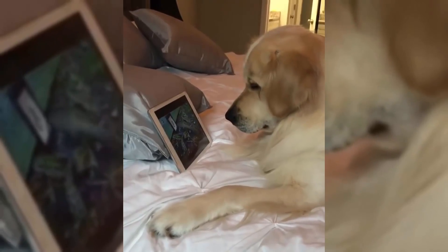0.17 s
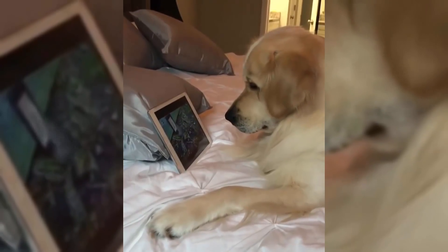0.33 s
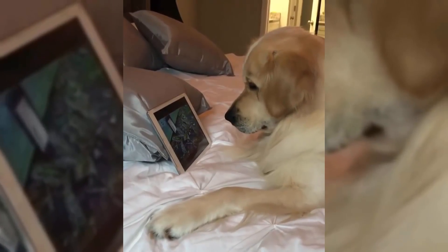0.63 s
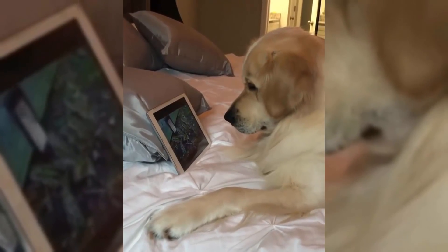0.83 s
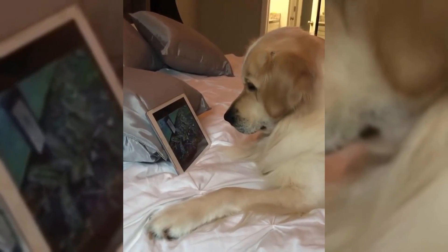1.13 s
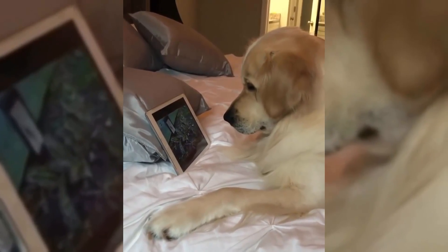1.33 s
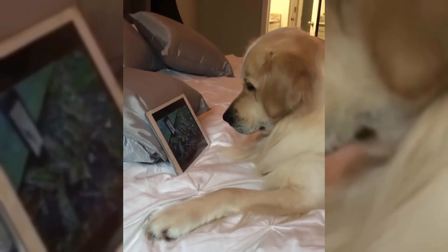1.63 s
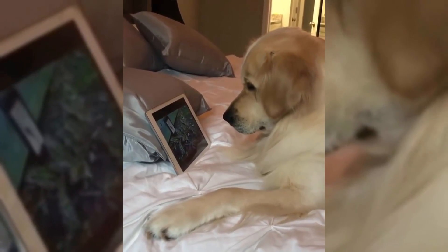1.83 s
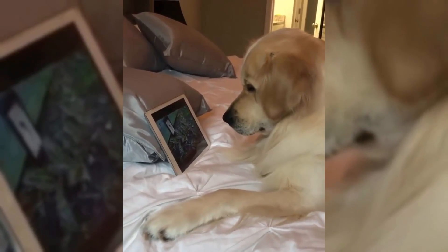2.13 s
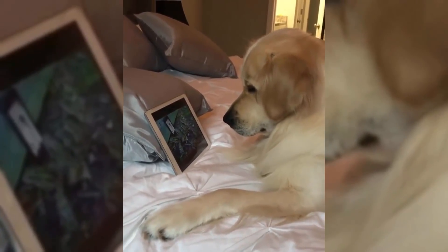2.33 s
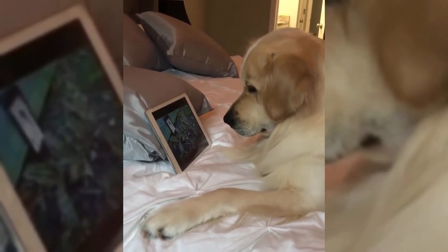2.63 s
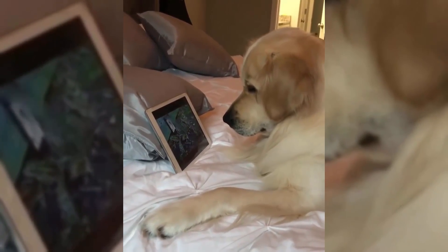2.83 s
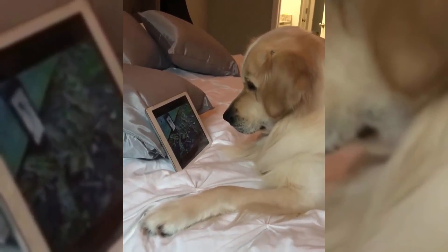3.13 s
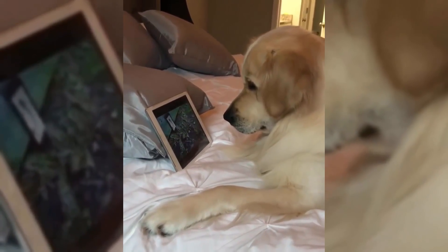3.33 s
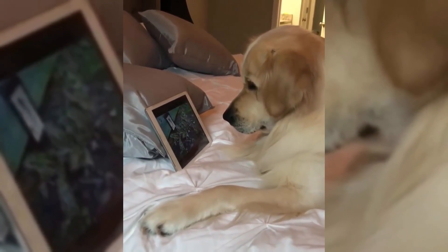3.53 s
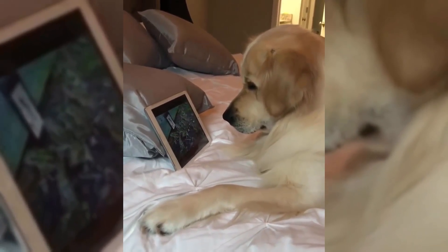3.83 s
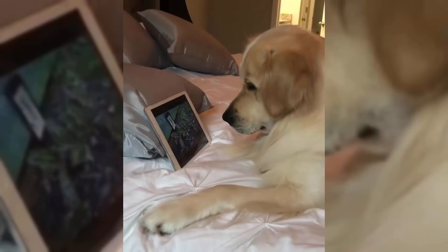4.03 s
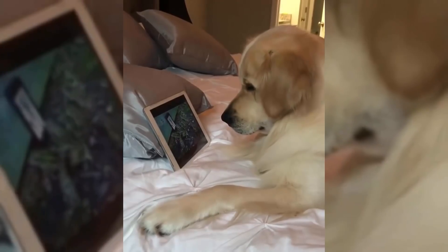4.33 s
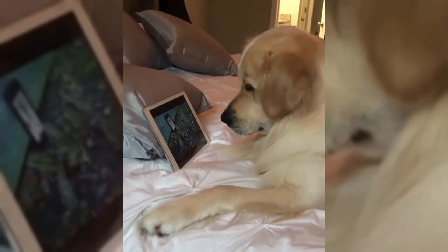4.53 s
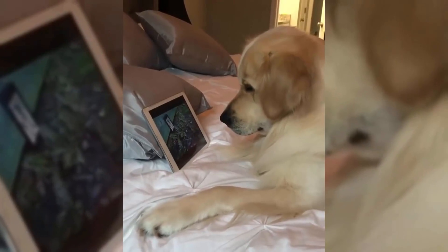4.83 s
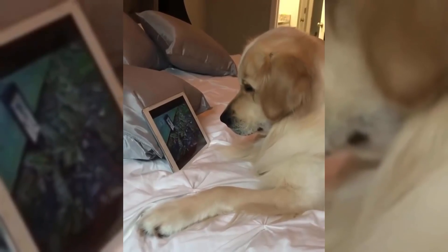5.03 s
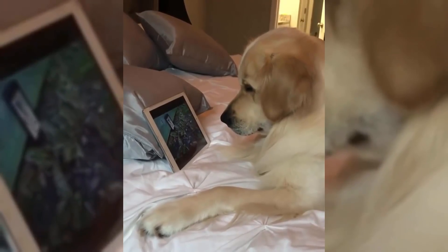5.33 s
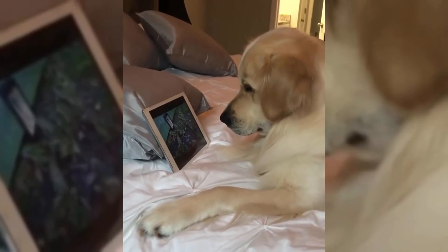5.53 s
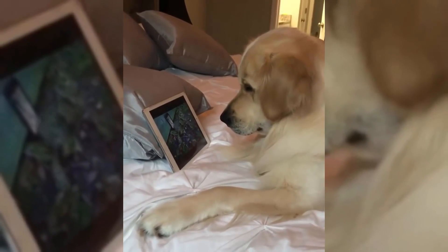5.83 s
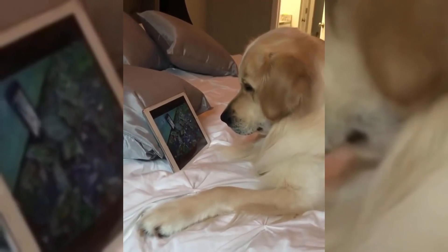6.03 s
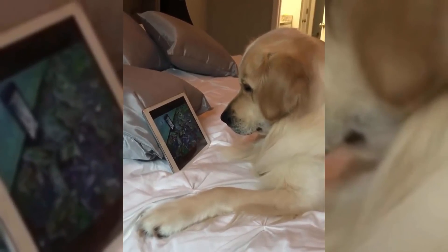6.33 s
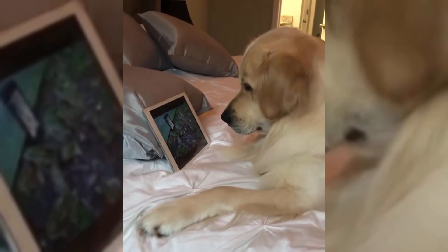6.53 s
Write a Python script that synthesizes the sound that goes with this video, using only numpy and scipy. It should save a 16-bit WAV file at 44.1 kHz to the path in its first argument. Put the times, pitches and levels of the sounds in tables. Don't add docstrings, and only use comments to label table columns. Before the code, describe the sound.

Very low-level indoor ambience, with a golden dog resting on a bed beside a tablet. Continuous low hum and blowing duct air sit beneath a narrow, grainy hiss. Soft dry ticks come in an early cluster, ending in a sharper tiny click. After a calm gap, a faint hoarse whine drops quickly in pitch, followed by clicks and a brief dip in hiss. The rest is steady, with few ticks, small dry room, phone microphone.

```python
import sys
import numpy as np
from scipy import signal
from scipy.fft import rfft, irfft, next_fast_len
from scipy.io import wavfile
from scipy.ndimage import uniform_filter1d, map_coordinates

SR = 44100
rng = np.random.default_rng(int(sys.argv[2]) if len(sys.argv) > 2 else 0)


def voltage_ratio(level):
    return 10 ** (np.asarray(level, float) / 20)


def to_wav(sig):
    pcm = np.clip(np.atleast_2d(sig), -1, 1) * 32767
    pcm = np.round(pcm).astype(np.int16)
    wavfile.write(sys.argv[1], SR, pcm.T)


N = 294014
RUSTLE_DB = -61
SHEEN_HZ = 7200


def unit(x):
    return x / np.sqrt(np.mean(x ** 2) + 1e-20)


def seconds():
    return np.arange(N) / SR


def along(points, hz):
    f, v = np.transpose(points)
    return np.interp(np.log(hz + 1), np.log(f + 1), v)


def curves(rows):
    s, *cols = np.transpose(rows)
    return [np.interp(seconds(), s, c) for c in cols]


def wobble(rate):
    return map_coordinates(rng.standard_normal(N // 200), [seconds() * rate])


def filtered(x, response):
    m = next_fast_len(N + 8192)
    return irfft(rfft(x, m) * response(np.fft.rfftfreq(m, 1 / SR)), m)[:N]


def rush(response, patchy_db):
    z = signal.stft(rng.standard_normal(N), nperseg=512)[2]
    field = uniform_filter1d(rng.standard_normal(z.shape), size=6, axis=0)
    field = uniform_filter1d(field, size=8, axis=1)
    patchy = signal.istft(z * voltage_ratio(patchy_db * unit(field)), nperseg=512)[1][:N]
    return unit(filtered(patchy, response))


def busy():
    settle_s, span_s = 2.05, 0.13
    return (1 - np.tanh((seconds() - settle_s) / span_s)) / 2


def since_duck():
    late = np.maximum(seconds() - 2.935, 0)
    return late, 1 - np.exp(-late / 0.015)


# pitch in Hz, level in dB rms.
MAINS_LINES = [(120, -54.5), (240, -57), (360, -71.5)]


def hum():
    total = 0
    for hz, db in MAINS_LINES:
        level_db = db + 0.4 * wobble(3.35)
        if hz < 200:
            level_db = level_db + 2.5 * busy() + 1.3 * wobble(4.9)
        turn = 2 * np.pi * hz * seconds() + 0.045 * wobble(3.7)
        total = total + np.sqrt(2) * voltage_ratio(level_db) * np.sin(turn)
    return total


# pitch in Hz, width in Hz, boost in dB.
ROOM_RESONANCES = [(39.3, 6.7, 1), (58, 7, 4), (72.4, 5, 0.5), (120, 13, 2), (142, 11, -4.5), (172, 7.1, 3),
                   (205, 10, -2.5), (240, 12, -5), (260, 11, 2), (311, 7, 2.5), (410, 14, 1.5)]


def modes(f):
    return voltage_ratio(sum(db * np.exp(-((f - hz) / w) ** 2) for hz, w, db in ROOM_RESONANCES))


def standing_waves():
    knots = rng.standard_normal(SR // 20)
    return lambda f: voltage_ratio(1.9 * map_coordinates(knots, [f / 24]))


# frequency in Hz, level in dB per Hz.
RUMBLE_COLOUR = [(20, -49), (37, -2.5), (100, -5.5), (170, -1), (210, -5), (265, -2), (310, -4.5),
                 (345, -8.5), (380, -12.5), (600, -9.5), (800, -18.5), (1000, -18.5), (1700, -29),
                 (2500, -51)]


def rumble(ripple):
    colour = lambda f: voltage_ratio(along(RUMBLE_COLOUR, f)) * modes(f) * ripple(f) ** 0.45
    return voltage_ratio(-53.5) * rush(colour, patchy_db=1.1)


# middle in seconds, peak level in dB, half length in seconds.
VENT_GUSTS = [(0.166, -54, .12), (1.152, -53, 0.2), (.93, -55, .1), (1.38, -55, .08), (1.58, -57, 0.2),
              (1.92, -58, 0.13), (.58, -59, .12), (3.56, -54.5, 0.12), (3.82, -56.5, 0.21),
              (4.75, -58, 0.22), (5.383, -57.5, 0.22), (6.55, -61, .15)]


def gusts():
    calm_db = -75
    power = sum(voltage_ratio(2 * db) * np.exp(-((seconds() - s) / half) ** 2) for s, db, half in VENT_GUSTS)
    return 10 * np.log10(power + voltage_ratio(2 * calm_db))


def surge():
    points = [(25, -61), (42, -11.0), (58, 2.5), (70, 2), (86, 3.5), (102, -4.0),
              (140, 4.5), (168, 1.0), (200, -29.0), (240, -54.0)]
    colour = lambda f: voltage_ratio(along(points, f)) * modes(f)
    return voltage_ratio(gusts() - 2 + 2 * wobble(6)) * rush(colour, patchy_db=0.7)


def boom():
    turn = 2 * np.pi * np.cumsum(85.5 * (1 + 0.0322 * wobble(6))) / SR
    return np.sqrt(2) * voltage_ratio(gusts() - 6 + 1.9 * wobble(9)) * np.sin(turn)


# pitch in Hz, width in Hz, level in dB.
DUCT_RESONANCES = [(723, 31, 4), (757, 71, 1.5), (836, 39, -22.5)]


def duct():
    late, onset = since_duck()
    level_db = -60.5 + 2 * np.clip(seconds() - 5.9, 0, .5) * 2
    level_db = level_db - 15 * onset * np.exp(-(late / .062) ** 4)
    sway_db = 0.7 * (wobble(9) + wobble(3.08))

    def pipe(f):
        return sum(voltage_ratio(db) * (f * w) ** 2 / ((c * c - f * f) ** 2 + (f * w) ** 2)
                   for c, w, db in DUCT_RESONANCES)

    return voltage_ratio(level_db + sway_db + 1.63) * rush(pipe, patchy_db=-1.0)


# frequency in Hz, level in dB per Hz.
FIZZ_COLOUR = [(5600, -60), (5720, -14.5), (5980, -2.5), (6150, 0), (7250, -6.5), (7400, -10),
               (10000, -10.5), (10600, -12.5), (12200, -5.5), (13300, -11.5), (13950, -13.5), (14050, -47)]


def fizz():
    above_db = rustle_level() - RUSTLE_DB
    hiss = voltage_ratio(-72.5) * rush(lambda f: voltage_ratio(along(FIZZ_COLOUR, f)), patchy_db=2.03)
    hiss = hiss * voltage_ratio(.25 * above_db + .7 * wobble(10))
    low_part = filtered(hiss, lambda f: f < SHEEN_HZ)
    return hiss + low_part * (voltage_ratio(1.35 * np.maximum(above_db, -1.5)) - 1)


def faint_band():
    return voltage_ratio(-82.5) * rush(lambda f: (f > 5070) & (f < 5720), patchy_db=5.5)


def rustle_level():
    late, onset = since_duck()
    return RUSTLE_DB + 2 * busy() - 11 * onset * np.exp(-late / 0.1)


# frequency in Hz, level in dB per Hz.
RUSTLE_COLOUR = [(900, -17.5), (1500, -5), (2200, -2), (2950, -5), (3090, 3), (3250, -1.5), (3900, 4),
                 (4300, 1), (4650, 2.5), (4750, -0.5), (4980, 0), (5080, -18), (5300, -60)]


def rustle(ripple):
    level_db = rustle_level() - 0.07 + 0.86 * wobble(16)
    grain_db = 1 * busy() * wobble(130)
    colour = lambda f: voltage_ratio(along(RUSTLE_COLOUR, f)) * ripple(f)
    return voltage_ratio(level_db + grain_db) * rush(colour, patchy_db=1.0)


# frequency in Hz, seconds to fall by 60 dB.
WALL_DECAY = [(300, .1), (2000, .16), (3200, .11), (8000, .027)]


def room(x):
    hz, t, z = signal.stft(rng.standard_normal(SR // 3), SR, nperseg=256)
    fading = z * voltage_ratio(-60 * t / along(WALL_DECAY, hz)[:, None])
    tail = signal.istft(fading, SR, nperseg=256)[1]
    return signal.fftconvolve(np.pad(x, (200, 0)), tail / np.linalg.norm(tail))[:N]


# start in seconds, level in dB, pitch in Hz, seconds to fall by 60 dB.
CASING_RINGS = [(.412, -45, 2020, 0.034), (1.3142, -42, 1210, .014), (1.435, -43, 2350, 0.02),
                (1.435, -43, 3370, .016), (1.6, -45, 4300, 0.02), (1.29, -46, 3450, .025),
                (1.29, -47, 4200, .025), (1.595, -53, 1510, .03), (1.777, -42, 3130, 0.029),
                (1.9985, -32, 3190, 0.018), (1.9985, -42, 2440, 0.015), (1.9985, -51, 7960, .012),
                (2.9195, -45, 2310, 0.02), (2.9185, -42, 4620, 0.02), (2.9, -48, 2300, .016),
                (2.9, -44, 3080, .025), (.408, -53, 3090, .03), (.408, -53, 4200, .03),
                (.408, -46, 4700, 0.035), (4.6385, -47, 4630, .02), (4.6385, -51, 2500, .02),
                (5.761, -48, 2410, 0.024), (6.6, -56, 1870, .03), (3.229, -42.5, 1950, 0.041),
                (3.229, -41, 2110, 0.047), (3.228, -47, 2850, .03), (3.2275, -38, 3450, 0.017),
                (3.2275, -43.5, 5000, 0.019), (3.228, -60, 6600, .04), (4.8075, -45.5, 1310, 0.018),
                (4.8075, -46.5, 1870, 0.016), (4.808, -49.5, 3060, 0.08), (4.808, -57, 2530, .08),
                (4.808, -53, 2800, .05), (4.809, -51, 710, .04), (.4055, -47, 2150, .025),
                (2.9155, -50, 2350, .02), (2.926, -51, 2350, .015), (2.93, -48, 2350, .02),
                (2.944, -51, 2450, .012), (2.9485, -50, 2300, .015), (2.9185, -52, 6400, .015),
                (2.9185, -57, 8500, .015), (1.619, -49, 2320, .025), (1.702, -47, 2350, .03),
                (1.65, -49, 3870, .025), (3.229, -46, 4350, .025)]


def pings():
    out, t = np.zeros(N + SR), np.arange(SR // 20) / SR
    swell = (1 - np.exp(-t / 0.00062)) ** 2
    for s, db, hz, t60 in CASING_RINGS:
        start = round(s * SR)
        out[start:][:len(t)] += voltage_ratio(db - 60 * t / t60) * swell * np.sin(2 * np.pi * hz * t)
    return out[:N]


# pitch in Hz, width in Hz.
TICK_RESONANCES = [(750, 400), (1500, 960), (2550, 1070), (4000, 1700), (6600, 630)]
# time in seconds, peak level in dB,
# brightness in octaves over 1 kHz, narrowness in dB lost per octave away from there.
CONTACTS = [(.407, -37, 1.9, 12), (.4124, -41.5, 1.56, 12), (1.111, -42, 0.4, 10), (1.2228, -39, 2.2, 12),
            (1.267, -44, 1.9, 6), (1.2893, -33, 1.9, 11), (1.3137, -44, 0.72, 5), (1.4339, -36.5, 1.85, 7),
            (1.59, -50, 1.2, 8), (1.6197, -50, 1.2, 5), (1.649, -39.5, 1.7, 8), (1.701, -39.5, 1.7, 6),
            (1.7128, -35.5, 2.1, 12), (1.765, -38.5, 2.2, 18), (1.777, -34, 2, 13), (1.835, -43, 2.05, 12),
            (1.8545, -38, 2.1, 10), (2.8996, -34, 1.85, 14), (2.91, -47, 1.7, 6), (2.928, -51, 1.6, 8),
            (3.253, -47, 1.6, 11), (2.9185, -41, 2.1, 6), (2.9587, -44, 1.9, 12), (3.228, -37.5, 1.7, 4),
            (3.235, -47, 1.1, 9), (3.241, -44, 1.8, 5), (.269, -43, 2.4, 11), (.959, -45, 1.7, 7),
            (1.308, -45, 1.9, 12), (3.018, -48, 2.2, 11), (3.608, -44, 1.34, 17), (4.6136, -47, 1.1, 14),
            (4.638, -44, 1.9, 6), (4.807, -42, 0.8, 4), (5.101, -43, 2.05, 16), (5.7607, -45, 1.2, 14),
            (.638, -47, 1.9, 12), (1.0995, -45, 2.1, 12), (1.319, -46, 1.8, 8), (2.874, -46, 1.9, 12),
            (3.5995, -47, 1.4, 10), (4.586, -47, 2.1, 12), (5.026, -48, 1.8, 12), (3.265, -47, 1.3, 10),
            (3.29, -47, 1.2, 12), (3.325, -48, 1.4, 12), (1.298, -45, 1.9, 12)]


def ticks():
    out, t = np.zeros(N + SR), np.arange(SR // 20) / SR
    shape = (t / .002) ** 2 * voltage_ratio(-60 * t / .009)
    parts = [signal.butter(1, [hz - w / 2, hz + w / 2], "band", fs=SR) for hz, w in TICK_RESONANCES]
    octaves = np.log2(np.transpose(TICK_RESONANCES)[0] / 1000)
    extra_db = [-2, 0, 0, 0, -10.5]
    for s, db, bright, narrow in CONTACTS:
        shares_db = extra_db - narrow * np.abs(octaves - bright)
        crackle = shape * rng.standard_normal(len(t))
        crackle[round(.0027 * SR)] += 13 * shape.max()
        start = round((s - .0012) * SR)
        for share, part in zip(shares_db, parts):
            band = signal.filtfilt(*part, crackle)
            out[start:][:len(t)] += voltage_ratio(db + share - 6.0) * band / np.abs(band).max()
    return out[:N]


# time in seconds, pitch in Hz, level in dB.
DOG_NOTE = [
    (2.801, 750, -87),
    (2.808, 709, -49.5),
    (2.822, 640, -55),
    (2.838, 600, -54.5),
    (2.86, 575, -61),
    (2.885, 575, -64),
    (2.9, 560, -86),
]


def whine():
    t = seconds()
    hz, db = curves(DOG_NOTE)
    turn = 2 * np.pi * np.cumsum(hz * (1 + 0.029 * wobble(70))) / SR
    voice = np.sin(turn) + 0.079 * np.sin(2 * turn)
    note = np.sqrt(2) * voltage_ratio(db + 1.8 * wobble(80)) * (db > -79) * voice
    second = 1.15 * np.roll(note, round(.067 * SR))
    held = voltage_ratio(-48.5) * np.exp(-((t - 2.91) / 0.023) ** 2) * np.sin(2 * np.pi * 755 * t)
    breath = rush(lambda f: (f > 570) & (f < 810), patchy_db=1.0)
    husk = voltage_ratio(-54) * np.exp(-((t - 2.86) / 0.044) ** 4) * breath
    return note + second + held + husk


def scene():
    points = [(5000, 1.0), (5100, -11), (5800, -25), (6100, 4.0), (7300, -4.5), (8500, 0.0), (10000, -20)]
    speaker = lambda f: voltage_ratio(along(points, f))
    ripple = standing_waves()
    air = rumble(ripple) + surge() + duct() + rustle(ripple) + fizz() + faint_band()
    near, rings, far = filtered(ticks(), speaker), filtered(pings(), speaker), whine()
    echo = room(voltage_ratio(-9) * near + voltage_ratio(-17) * rings + voltage_ratio(-23) * far)
    return (hum() + boom() + air + near + rings + far + echo)[None]


# frequency in Hz,
# limit in dB against the rustle for single lines, the same for whole bands.
DROPPED_BELOW = [(400, -21, -40), (1510, -27.5, -40), (4870, -21, -40), (5060, -30, -40), (5600, -21, -40),
                 (6000, -24.5, -26), (7300, -24, -26.5), (9500, -25.5, -27), (10500, -26, -27),
                 (12300, -24.3, -27), (13100, -22, -25), (13600, -26.5, -24.8)]
# time in seconds, shift in dB.
FAINT_BAND_SHIFT = [(0, 0), (2.2, 0), (2.4, 1.8), (2.9, 1.8), (3.1, 0), (5.3, 0), (5.6, -1.5), (6.7, -1.5)]
# frequency in Hz, share of narrow bands dropped for a few frames.
DROPOUTS = [(6900, 0), (7500, .2), (8500, .1), (10300, .17), (11500, .06), (12400, .03), (13100, .14)]


def thinned(x):
    size, grid = 1024, 537
    n, k = np.arange(2 * size)[:, None], np.arange(size)
    window = signal.windows.kaiser_bessel_derived(2 * size, 4 * np.pi)[:, None]
    basis = window * np.cos(np.pi / size * (n + .5 + size / 2) * (k + .5)) * np.sqrt(2 / size)
    blocks = np.pad(x, (2 * size - grid, 2 * size))
    blocks = blocks[:len(blocks) // size * size].reshape(-1, size)
    lines = np.hstack([blocks[:-1], blocks[1:]]) @ basis
    hz, power = (k + .5) * SR / (2 * size), lines ** 2
    count = len(lines)

    masker = np.median(power[:, (hz > 3000) & (hz < 5000)], axis=1) / .45
    masker = uniform_filter1d(masker, size=45)
    whim = rng.standard_normal((count, size // 32 + 1))
    whim_db = 1.1 * whim[:, :1] + 1.3 * np.repeat(whim[:, 1:], 32, axis=1)
    masker = np.where(hz > SHEEN_HZ, 1.25 * np.median(masker), masker[:, None]) * voltage_ratio(2 * whim_db)
    f, line_db, band_db = np.transpose(DROPPED_BELOW)
    limit = lambda db: voltage_ratio(2 * np.interp(hz, f, db)) * masker
    heard = power > limit(line_db)
    heard &= uniform_filter1d(power, size=16, axis=1) > limit(band_db)

    edge = np.clip((np.arange(count) - 1) * size + grid, 0, N - 1)
    busy_now = power[:, (hz > 1000) & (hz < 5000)].sum(1)
    busy_now = (busy_now + 1e-12) / (uniform_filter1d(busy_now, size=15) + 1e-12)
    load_db = (rustle_level() + curves(FAINT_BAND_SHIFT)[0])[edge]
    load_db = load_db + 2.3 * rng.standard_normal(count) + 10 * np.log10(busy_now)
    heard &= (load_db < -62.3)[:, None] | (hz < 5080) | (hz > 5680)

    flutter = uniform_filter1d(whim[:, 0], size=2) + whim[:, -1] * .8
    top_hz = 14100 - 750 * np.clip(flutter, 0, 1.3)
    heard &= hz < top_hz[:, None]

    luck = uniform_filter1d(rng.standard_normal((count, size // 8)), size=2, axis=0)
    rank = np.argsort(np.argsort(luck, axis=0), axis=0) / count
    heard &= np.repeat(rank, 8, axis=1) >= along(DROPOUTS, hz)

    halves = (lines * heard) @ basis.T
    return (halves[1:, :size] + halves[:-1, size:]).ravel()[size - grid:][:N]


def band_limit(x):
    return signal.sosfilt(signal.butter(12, 14320, fs=SR, output="sos"), x)


def record(dry):
    mix = thinned(dry[0])[None]
    return band_limit(mix)


dry = scene()
out = record(dry)
to_wav(out)
```